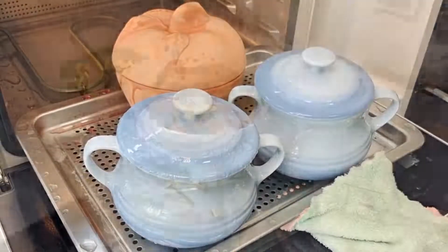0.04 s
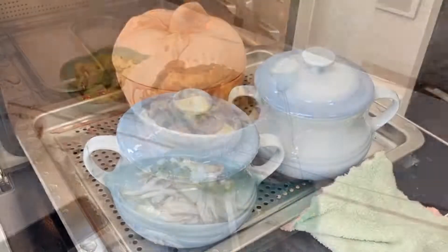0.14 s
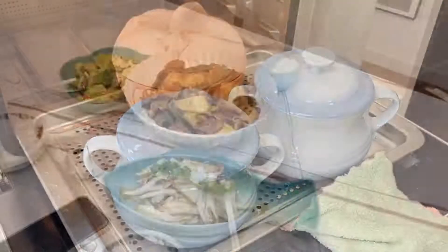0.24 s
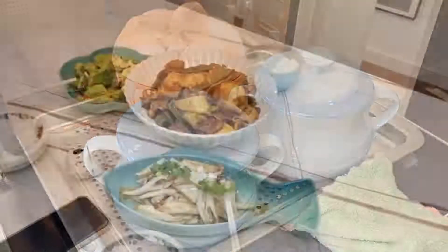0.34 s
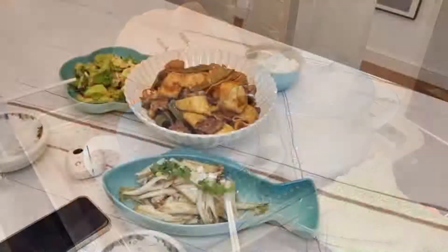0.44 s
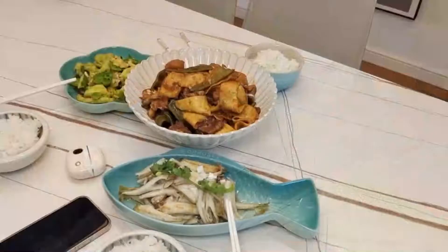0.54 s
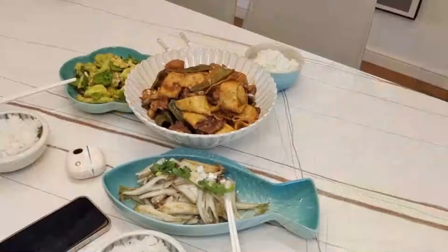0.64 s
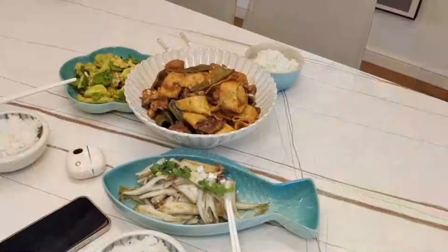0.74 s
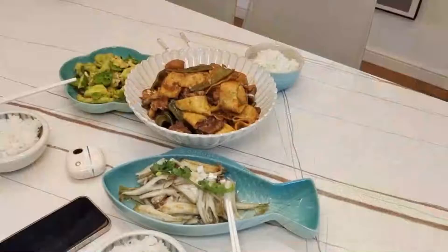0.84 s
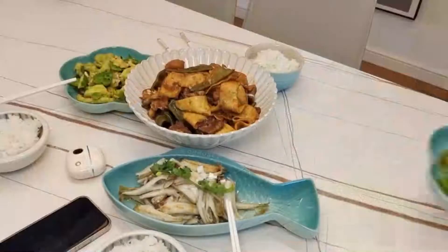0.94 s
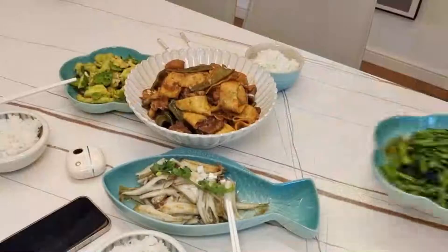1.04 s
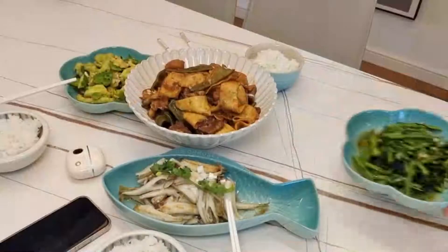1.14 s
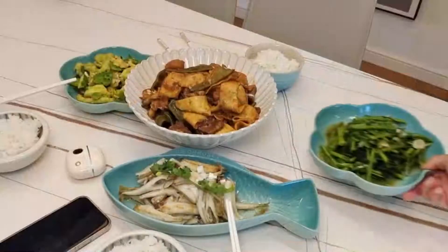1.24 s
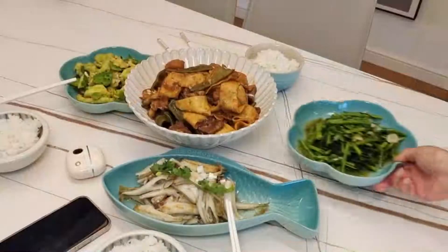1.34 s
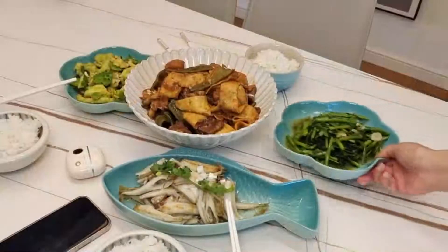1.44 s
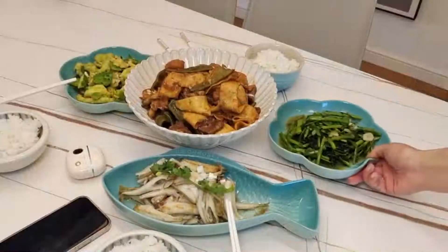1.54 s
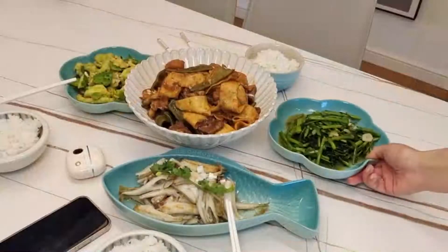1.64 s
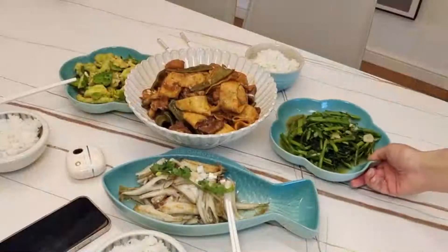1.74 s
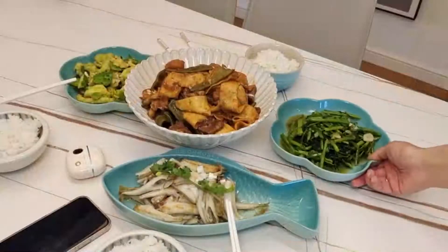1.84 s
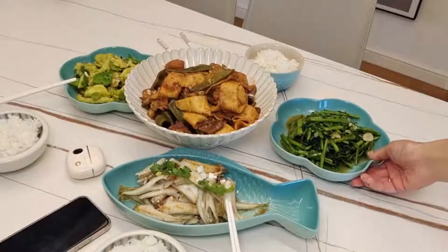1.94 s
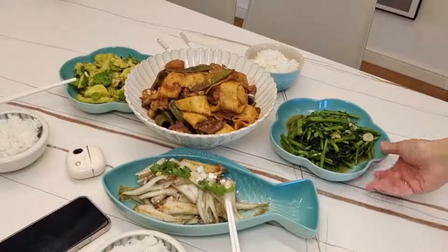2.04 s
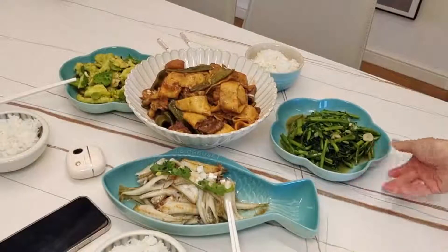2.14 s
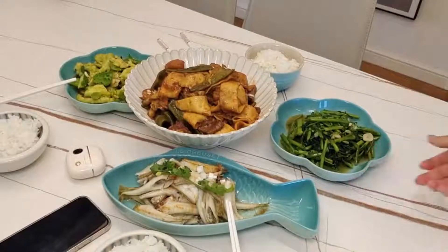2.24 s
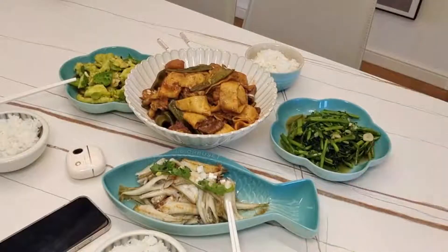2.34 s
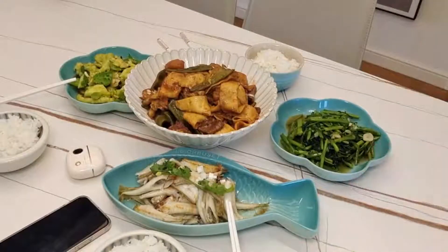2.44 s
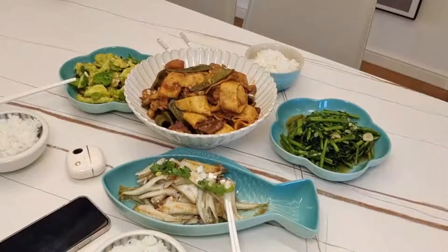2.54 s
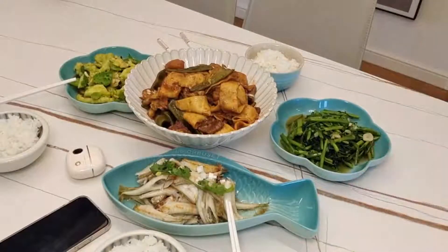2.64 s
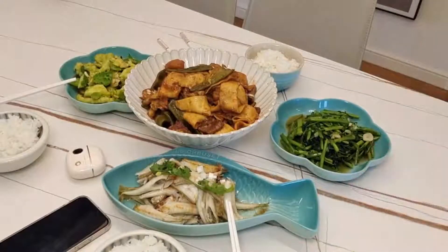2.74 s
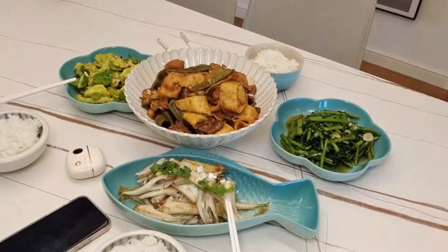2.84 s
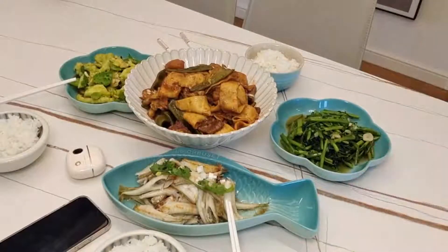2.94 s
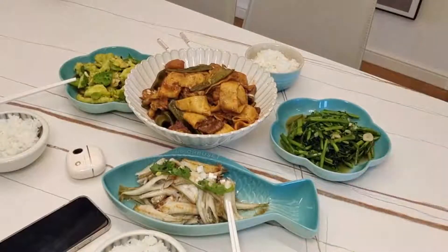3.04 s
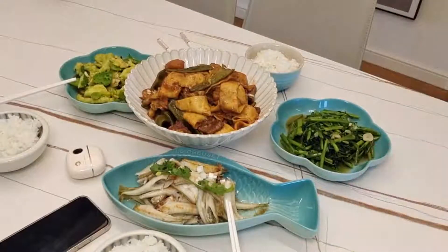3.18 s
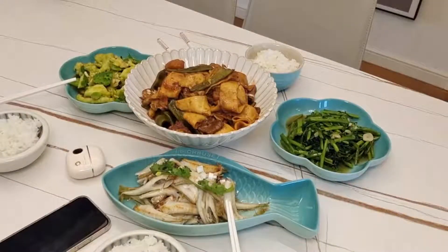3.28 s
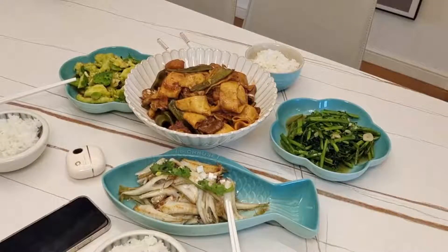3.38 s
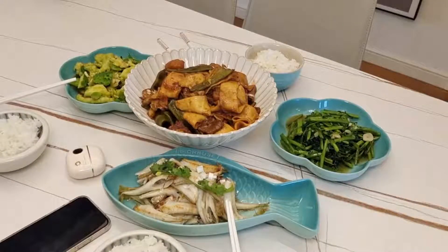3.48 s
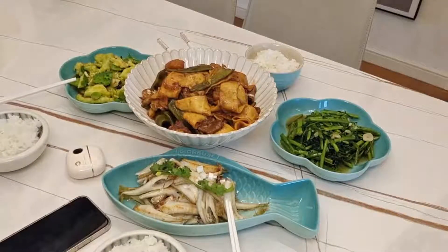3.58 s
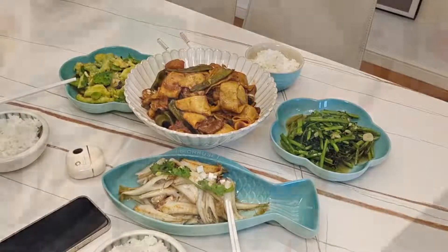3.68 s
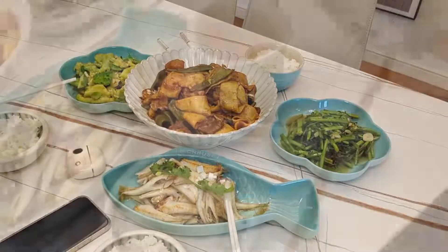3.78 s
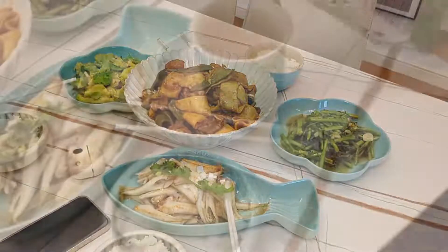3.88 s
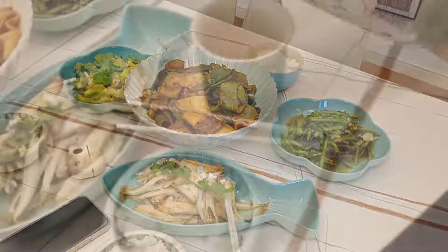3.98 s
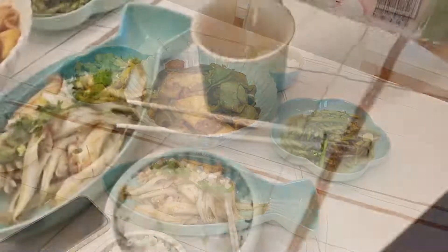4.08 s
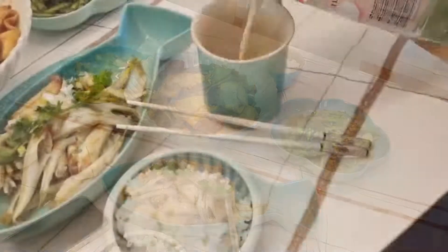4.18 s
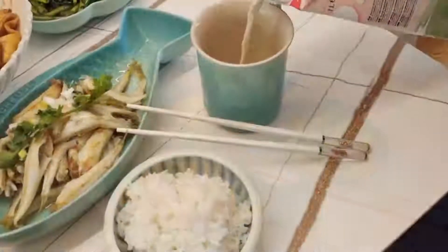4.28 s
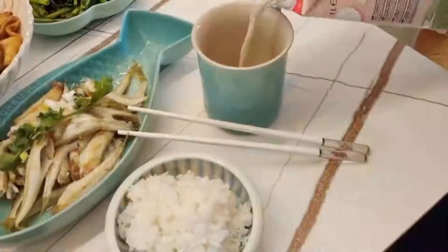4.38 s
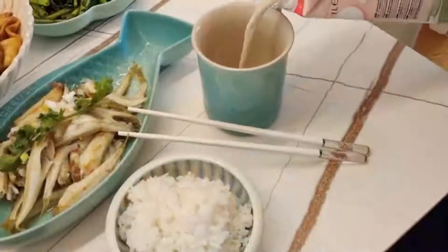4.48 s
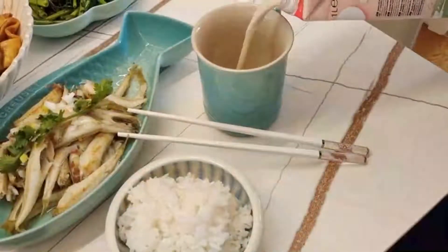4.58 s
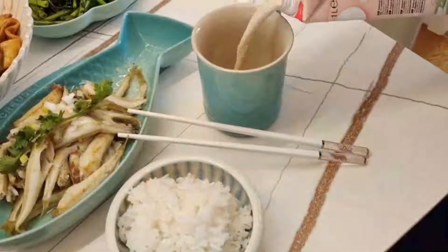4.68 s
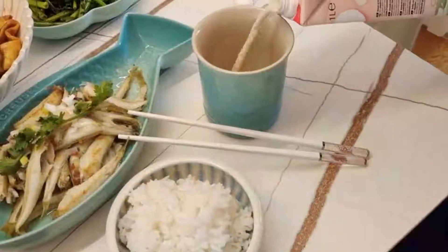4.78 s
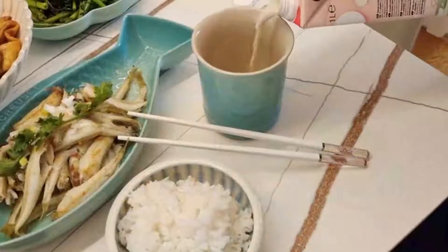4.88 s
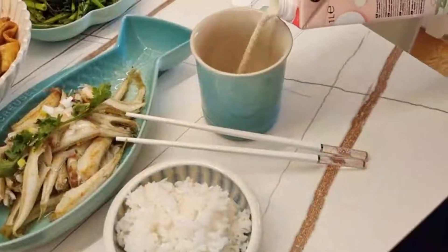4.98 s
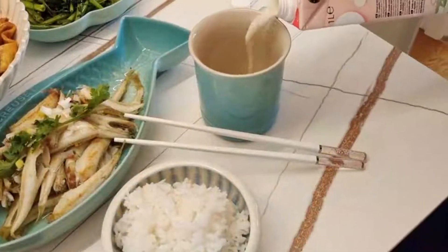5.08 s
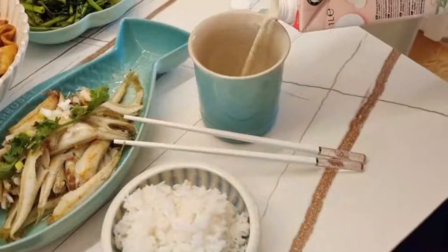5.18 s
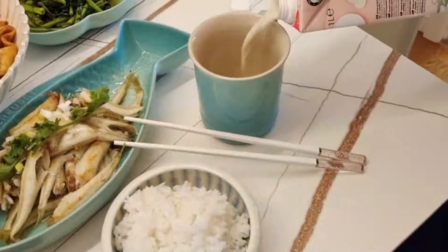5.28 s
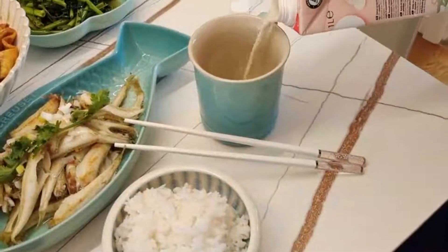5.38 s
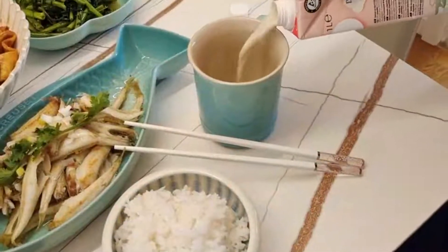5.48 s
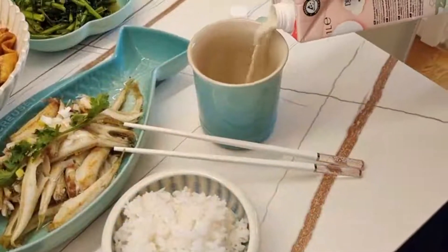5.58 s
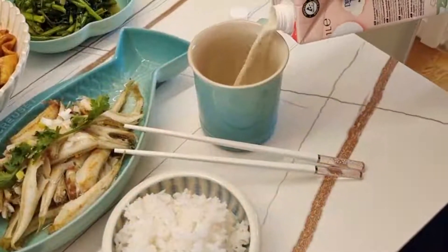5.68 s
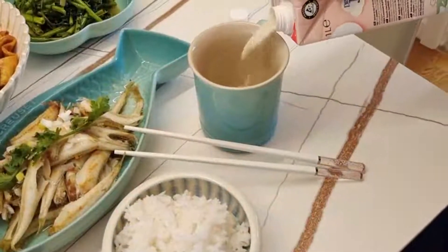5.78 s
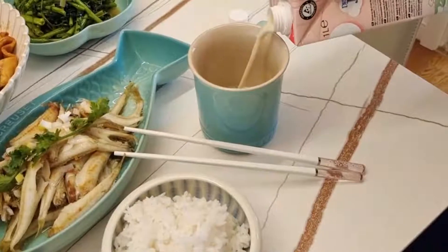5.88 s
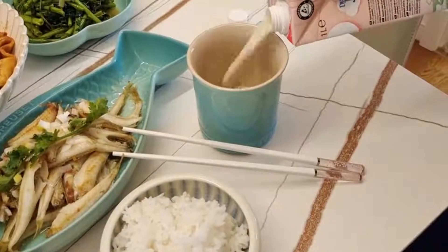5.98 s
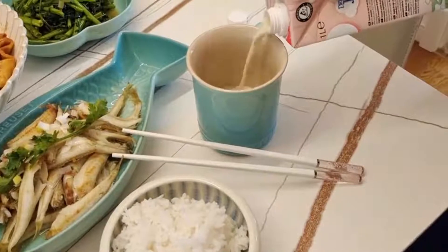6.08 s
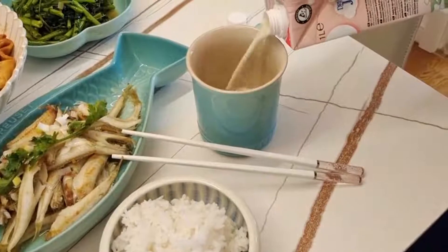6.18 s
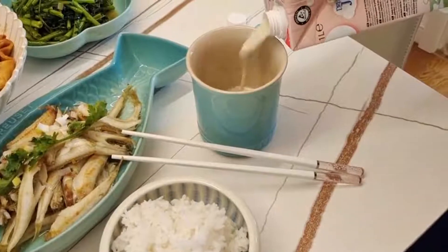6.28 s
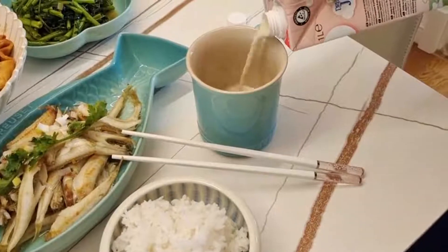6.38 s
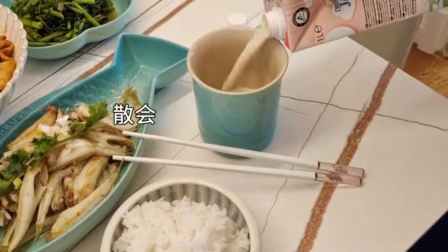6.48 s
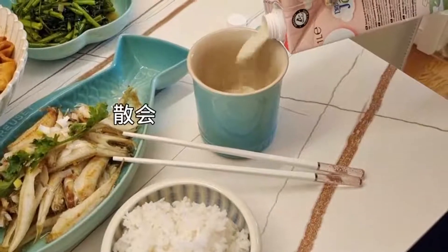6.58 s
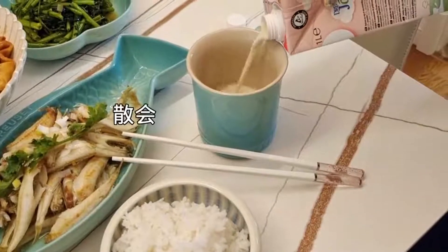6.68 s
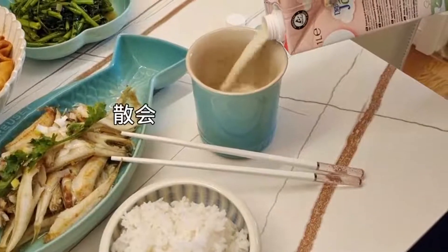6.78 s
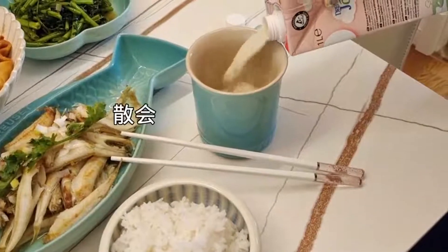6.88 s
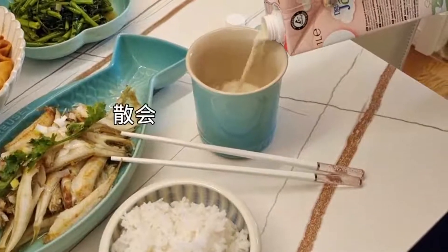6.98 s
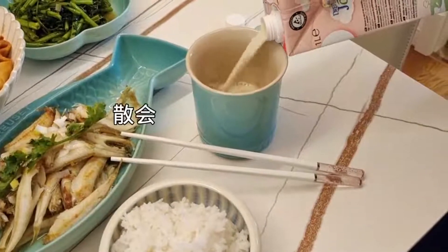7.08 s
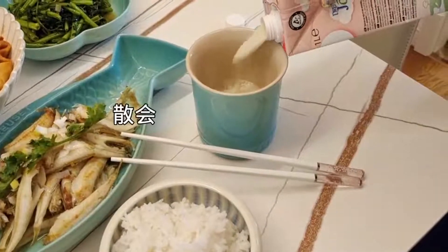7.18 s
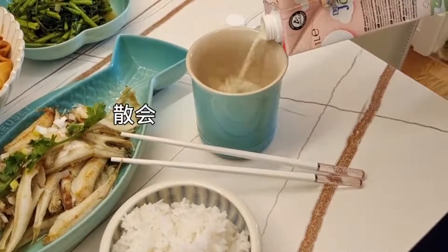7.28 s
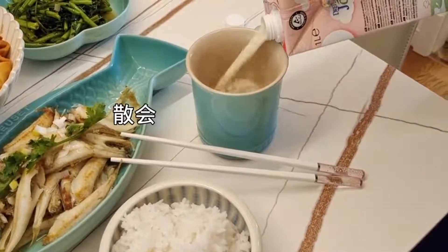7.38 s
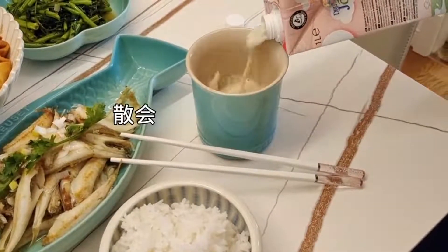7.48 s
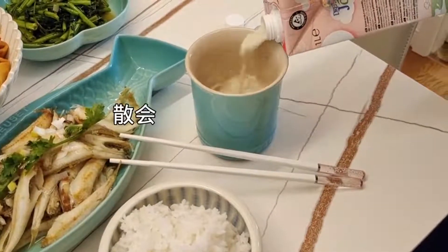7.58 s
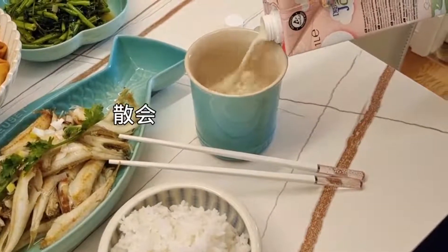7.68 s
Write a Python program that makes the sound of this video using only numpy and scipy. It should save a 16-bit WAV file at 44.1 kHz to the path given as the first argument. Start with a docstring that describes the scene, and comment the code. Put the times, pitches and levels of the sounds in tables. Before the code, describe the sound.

Very faint ticks open over soft indoor room tone. A heavy ceramic dish is set down hard, far louder than the rest, with a duller rattle just after and a short room tail. Then quiet; a few tiny clicks, and liquid pours into a cup in irregular spurts, plopping and splashing, with its hollow note slowly rising. Recorded close at the table, in stereo.

```python
"""A dish set down, then a drink poured

Faint scuffs, ticks and the brief ring of a ceramic lid sit over a low hum, a whine and soft room noise.
A ceramic dish knocks on a dining table and judders: each contact rings decaying modes and a noisy tail.
Then a carton pours a drink into a ceramic cup in uneven glugs. Single bubbles and swarms of tiny ones
excite the resonances of the air in the cup, whose lowest note climbs as it fills."""
import sys
import numpy as np
from scipy import signal
from scipy.fft import rfft, irfft, next_fast_len
from scipy.io import wavfile
from scipy.ndimage import uniform_filter1d

SR = 44100
rng = np.random.default_rng(int(sys.argv[2]) if len(sys.argv) > 2 else 0)


def int16_out(signal):
    """Quantize to a 16-bit WAV file."""
    q = np.round(np.clip(np.atleast_2d(signal).T, -1, 1) * 32767)
    wavfile.write(sys.argv[1], SR, q.astype(np.int16))


N = 340645  # length of the scene in samples

# Colour of the room noise, relative: (f/Hz, level/dB per Hz)
NOISE_COLOUR = [(20, -34), (45, -7), (75, -15), (110, -21), (160, -17), (205, -7.5), (390, -21.5),
                (600, -32.5), (730, -27), (1500, -41), (2400, -38.5), (4100, -49.5), (15500, -56.5)]
# How alike spread-out sound is at the left and right microphones: (f/Hz, likeness 0-1)
LEFT_RIGHT_LIKENESS = [(100, 0.86), (300, 0.76), (700, 0.18), (1500, 0.12), (4000, 0.1), (15000, 0.71)]
# How the room background changes: (t/s, hum level/dB, relative noise level/dB)
BACKGROUND_LEVELS = [(0, -60.5, 3), (3.49, -61.5, 0), (3.52, -62.5, 7), (4.05, -64.5, 6.5), (4.4, -63, 2),
                     (5.2, -69, 1), (7.7, -75.5, 4.5)]
NOISE_BASE_DB = -65
HUM_HZ = 56.3

# Modes of a faintly ringing ceramic lid: (f/Hz, level/dB, time to fall 60 dB/s)
LID_MODES = [(1933, -50.5, 0.11), (3560, -45, 0.13), (4670, -58, 0.14), (7273, -70.5, 0.16),
             (9100, -64, 0.12)]
# Faint scuffs and ticks of handling: (t/s, length/s, level/dB, centre f/Hz)
SCUFFS = [(0.129, 0.05, -67.5, 2170), (0.331, 0.035, -63, 2360), (0.656, 0.059, -56, 2440),
          (0.662, 0.055, -71.5, 7000), (3.529, 0.055, -61.5, 2715), (3.621, 0.0017, -54.5, 4340),
          (3.731, 0.0052, -55.5, 3130), (3.741, 0.0061, -56.5, 5700), (3.739, .011, -64, 1190)]

# Blows of the dish foot on the table; a harder blow has a higher treble limit, and a negative
# loss means growing bounces: (t/s, relative level/dB, treble limit f/Hz, loss per bounce/dB)
DISH_BLOWS = [(1.571, -19, 1100, 9), (1.5775, 5.5, 2450, 8.5), (1.622, -12, 2600, 9),
              (1.762, -12.5, 762, -2.3), (1.7859, -4, 800, 0.8), (1.8271, 0, 940, 10.5)]
# Modes of dish and table top: (f/Hz, relative level/dB, time to fall 60 dB/s)
DISH_MODES = [(135.1, -9.5, 0.69), (250.8, -8.5, 0.67), (314, -15, 0.36), (354.3, -7, 0.74),
              (371, -9.5, 0.35), (466.3, -7, 0.31), (549, -9.5, 0.22), (584, -15.5, 0.72), (620, -19, 0.27),
              (708, -11.5, 0.93), (756.5, 1.5, .33), (814, -12.5, 0.32), (991, -14.5, 0.46),
              (1235, -6.5, .42), (1505, -9, 0.44), (1759, 2.5, 0.31), (1920, -3.5, 0.45), (2043, -7.5, .65),
              (2240, -8, 0.63), (2480, -4.5, .25)]
# Colour of the dense ring of table and room: (f/Hz, relative level/dB per Hz)
RING_COLOUR = [(60, -32), (180, -34.5), (260, -6.5), (500, -6), (750, 2.5), (1000, -3.5), (2000, -2),
               (2800, -4), (3600, -12.5), (5500, -12), (6800, -20.5), (14000, -11)]
# How long that ring lasts: (f/Hz, time to fall 60 dB/s)
RING_DECAY = [(150, 0.72), (700, 0.48), (1800, 0.6), (3000, 0.49), (6000, 0.41), (14000, 0.35)]
BOUNCE_S, BOUNCE_RATIO = 0.0105, 0.78  # first gap between bounces, and how each next gap shrinks

# Single bubbles that plop out of the splashing: (t/s, f/Hz, peak level/dB, glide/octaves per s)
BUBBLES = [(4.311, 2256, -53, 15), (4.701, 2700, -61.5, -2), (4.754, 2540, -59, 27),
           (4.755, 5340, -51.5, -18), (4.851, 1223, -50, 19), (4.92, 5830, -43.5, -8),
           (4.968, 1790, -52.5, 28.5), (5.055, 2076, -50, 4), (5.201, 1900, -45.5, -4.5),
           (5.282, 794, -35, 7.5), (5.282, 1530, -36.5, 58.5), (5.289, 1272, -32.5, 50),
           (5.3779, 5610, -34, -12), (5.382, 860, -41, -17), (5.435, 801, -28, 3.5), (5.52, 2080, -43, -3),
           (5.5542, 1406, -38.5, 12), (5.596, 3900, -37, 14), (5.702, 2650, -44, 26.5),
           (5.7383, 789, -42, -2), (5.763, 839, -39, -7), (5.7964, 1930, -41, -13),
           (5.8768, 4600, -32.5, -2), (5.8914, 2390, -31, -12), (5.917, 797, -29, 2.5),
           (5.9364, 599, -39.5, 2), (6.0657, 1660, -43, 29), (6.0753, 853, -32, 13.5),
           (6.1413, 8200, -30.5, -16), (6.146, 1790, -38, 11), (6.208, 2414, -39, 8),
           (6.2656, 2670, -41.5, -8), (6.368, 3340, -45.5, -7), (6.5656, 2800, -44, 11),
           (6.698, 2820, -43, 2), (6.7339, 1830, -35.5, 19), (6.749, 450, -39.5, -12),
           (6.785, 1000, -39, 5.5), (6.8851, 922, -24.5, 3.5), (6.8993, 2020, -32.5, 8),
           (6.8966, 947, -24, -13), (6.9082, 405, -35, 10), (6.996, 2200, -32.5, 4),
           (7.0132, 2680, -38, 15), (7.0118, 363, -42, 12), (7.162, 1275, -40, -3),
           (7.2285, 2210, -37.5, -1), (7.314, 5780, -38, 47), (7.319, 1590, -36.5, -18),
           (7.4892, 708, -25, 8), (7.4905, 1287, -35.5, 22), (7.5004, 2123, -26.5, 10.5),
           (7.57, 1626, -39.5, 16), (7.6285, 836, -30.5, -22), (7.629, 372, -34.5, -12),
           (7.6313, 3680, -36, -6), (7.661, 359, -42, -13), (7.6777, 2370, -34, -2)]
# Gushes landing in the cup, with relative levels of three sizes of splash:
# (t/s, length/s, slosh level/dB, spray level/dB, fizz level/dB)
GUSHES = [(4.835, 0.027, -64.5, -65, -67), (4.909, 0.021, -68.5, -72, -61.5),
          (5.047, 0.023, -73, -58.5, -66.5), (5.199, 0.016, -63, -48.5, -65),
          (5.359, 0.031, -61.5, -52, -70), (5.572, 0.043, -59, -46.5, -77), (5.696, 0.076, -75, -54, -71.5),
          (5.791, 0.017, -73, -47.5, -67), (5.9, 0.07, -49, -58, -65), (6.065, 0.018, -45.5, -49.5, -66),
          (6.14, 0.005, -57, -44, -42.5), (6.206, .08, -59, -51, -65), (6.404, 0.035, -43.5, -52, -56),
          (6.551, 0.039, -46.5, -54, -78), (6.731, 0.044, -35.5, -46.5, -53),
          (6.886, 0.018, -36, -41.5, -60.5), (6.958, .03, -45, -51.5, -71), (7.009, .035, -45, -45, -52.5),
          (7.103, 0.015, -49, -54, -86), (7.156, .035, -43, -45.5, -53), (7.31, 0.012, -37.5, -41, -46),
          (7.481, 0.031, -34, -47.5, -57.5), (7.623, 0.022, -36.5, -41.5, -52),
          (7.677, 0.036, -44, -47.5, -65.5)]
# Colour of the tiny droplets and bubbles in a gush: (f/Hz, relative level/dB)
DROPLET_COLOUR = [(190, -4.5), (380, -3.5), (550, -6), (850, 3.5), (1400, -4), (2700, -6), (3200, -12.5),
                  (4600, -10), (6000, -14), (8500, -12.5), (11000, -26), (14500, -16.5)]
# How far the carton is tipped; the stream thickens and its gushes grow tongues: (t/s, tilt 0-1)
CARTON_TILT = [(5.4, 0.14), (5.75, 0.85)]
# The main note of the air column, which shortens as the cup fills: (t/s, f/Hz)
CUP_AIR_NOTE = [(5.2, 770), (5.8, 828), (6.3, 830), (6.9, 975), (7.701, 1000)]
# Cross modes of the air in the cup: (f/Hz, width/Hz, level/dB)
CUP_CROSS_MODES = [(1472, 19, -3.5), (1940, 69, 4.5), (2124, 38, -6), (2513, 38, 2.5), (2658, 36, 11),
                   (2770, 76, 2.5), (3400, 160, 5), (4650, 36, -1), (6300, 54, 0.5), (8940, 84, 1)]
# Phase of the cup between the two microphones: (f/Hz, left lead/radians)
CUP_PHASE = [(300, 0.5), (780, .5), (950, 1.5), (1620, 1), (1950, -1.7), (2400, -2), (2750, -5), (4700, -5),
             (8000, -5.5)]
# Balance of the cup between the two microphones: (f/Hz, left minus right level/dB)
CUP_BALANCE = [(400, 1), (900, 2.5), (1750, 7.5), (2500, -9.5), (3300, 0.5), (5000, -4), (8000, -2),
               (15000, 2)]
SWELL_CYCLES = 4.3  # a single bubble swells for at least this many cycles, so high ones are brief
CLIMB_GLIDE = 32  # octaves per s: a bubble that climbs this fast swells for twice as long
LEAD_S, LEAD_WIDTH_S = 0.036, 0.012  # a thin tongue of droplets lands this long before a gush
THICKEN_S, TONGUE_SCATTER = 0.07, 0.46  # time for bubbles to grow before a gush; their size scatter 0-1
SLAP_S = 0.012  # fade time of the wet slap of a bubble

EDGE_HZ = 15800  # upper limit of the whole sound


def amp(db):
    """Turns decibels into gain."""
    return 10 ** (np.asarray(db) / 20)


def unit(x):
    """Scales a sound to an average (rms) strength of 1."""
    return x / np.sqrt(np.mean(x ** 2) + 1e-20)


def read(points, hz):
    """Reads a table between its points along a logarithmic frequency axis."""
    f, value = np.transpose(points)
    return np.interp(np.log(hz + 1), np.log(f), value)


def follow(points, t):
    """Reads a two-column table between its points in time."""
    return np.interp(t, *np.transpose(points))


def add(mix, s, sound):
    """Mixes a sound in at time s, cutting off what runs past the end."""
    part = mix[..., max(round(s * SR), 0):][..., :sound.shape[-1]]
    part += sound[..., :part.shape[-1]]


def shape(x, response):
    """Filters a sound by a function of frequency."""
    size = next_fast_len(x.shape[-1] + 4096)
    spectrum = rfft(x, size) * response(np.fft.rfftfreq(size, 1 / SR))
    return irfft(spectrum, size)[..., :x.shape[-1]]


def diffuse(size):
    """Stereo noise from all around: most alike at both microphones in the bass and highest treble."""
    a, b = rng.standard_normal((2, size))
    same = lambda hz: np.clip(read(LEFT_RIGHT_LIKENESS, hz), -1, 1)
    mid = shape(a, lambda hz: np.sqrt((1 + same(hz)) / 2))
    side = shape(b, lambda hz: np.sqrt((1 - same(hz)) / 2))
    return np.array([mid + side, mid - side])


def tail(colour, t60, size=SR):
    """A dense stereo decay with energy 1 per channel on average; each band dies at its own speed."""
    hz, t, z = signal.stft(diffuse(size), SR, nperseg=512)
    fade_db = -60 * t / read(t60, hz)[:, None]
    z = z * amp(read(colour, hz)[:, None] + fade_db)
    return unit(signal.istft(z, SR)[1][:, :size]) / np.sqrt(size)


def background(room_noise_db=1, whine_hz=5523, whine_db=-98):
    """A gently wavering appliance hum and a faint steady whine over soft room noise."""
    s, hum_db, noise_db = np.transpose(BACKGROUND_LEVELS)
    t = np.arange(N) / SR
    waver = 1 + 0.1 * unit(shape(rng.standard_normal(N), lambda hz: np.exp(-hz / 5)))
    hum = amp(np.interp(t, s, hum_db)) * np.sqrt(2) * waver * np.sin(2 * np.pi * HUM_HZ * t)
    noise = shape(diffuse(N), lambda hz: amp(read(NOISE_COLOUR, hz)))
    noise /= np.std(shape(noise, lambda hz: hz > 80))  # set the level by what lies above 80 Hz
    noise_gain = amp(NOISE_BASE_DB + room_noise_db + np.interp(t, s, noise_db))
    whine = amp(whine_db) * np.sin(2 * np.pi * whine_hz * t)
    return hum + whine + noise_gain * noise


def handling(sharpness=4.3, skirt=0.0025, lag_turns=0.28, room_db=-4):
    """Decaying lid tones and brief bands of scuffing noise, with a room tail added."""
    t, out = np.arange(SR) / SR, np.zeros((2, N))
    for s, length, db, centre_hz in SCUFFS:
        def band(hz):
            """A peak on a skirt that is stronger for shorter contacts, giving them a wider spectrum."""
            peak = 1 / (1 + (sharpness * np.log2((hz + 1) / centre_hz)) ** 2)
            return (hz > 600) * skirt / np.sqrt(length) + peak
        u = t / length * 2
        add(out, s, amp(db) * unit(shape(diffuse(SR), band)) * (u * np.exp(1 - u)) ** 2)
    lag = np.array([[0], [lag_turns]])  # right channel is ahead by part of a cycle
    for hz, db, t60 in LID_MODES:
        fade = amp(db - 60 * t / t60) * np.minimum(t / 0.00047, 1)
        add(out, 0, fade * np.sin(2 * np.pi * (hz * t + lag)))
    room = tail([(300, -2.0), (12000, -3.5)], RING_DECAY)
    return out + amp(room_db) * signal.fftconvolve(out, room, axes=1)[:, :N]


def bounces(count=5):
    """Every blow chatters in ever quicker contacts, mostly weakening: (t/s, level/dB, treble limit/Hz)."""
    for s, db, corner_hz, loss_db in DISH_BLOWS:
        for k in range(count):
            yield s, db - k * loss_db, corner_hz
            s += BOUNCE_S * BOUNCE_RATIO ** k


def dish(knock_db=-8, knock_hz=720, knock_s=0.0011, modes_db=-27, after_db=-37, after_t60=1.76,
         ring_db=15.0, build_s=0.0028):
    """Each contact gives a short knock, rings the modes and stirs the room; soft blows lack treble."""
    t, out = np.arange(SR) / SR, np.zeros((2, N))
    knock_shape = t / knock_s * np.exp(1 - t / knock_s)
    knock = amp(knock_db) * knock_shape * np.sin(-2 * np.pi * knock_hz * t)
    body = np.zeros((2, SR))
    for hz, db, t60 in DISH_MODES:
        # a quick decay gives way to a faint long one
        fade = amp(-60 * t / t60) + amp(after_db - 60 * t / after_t60 * max(hz / 1100, 1))
        # high modes reach the two microphones further out of step
        lag = np.array([[1], [-1]]) * min(hz / 1500, 1) * rng.uniform(0.59, 0.95)
        body += amp(modes_db + db) * fade * np.sin(2 * np.pi * hz * t + lag)
    for s, db, corner_hz in bounces():
        ring = amp(ring_db) * tail(RING_COLOUR, RING_DECAY) * (1 - np.exp(-t / build_s))
        soften = signal.butter(2, min(corner_hz, SR / 3), fs=SR, output="sos")
        add(out, s, amp(db) * signal.sosfilt(soften, knock + body + ring))
    # a steep high-pass at 150 Hz keeps deep bass out of the dish sound
    return signal.sosfilt(signal.butter(4, 150, "high", fs=SR, output="sos"), out)


def bubble(hz, swell_s, glide):
    """A bubble swells, rings and dies as its pitch glides; one that climbs far enough bursts at the surface."""
    t = np.arange(0, 7 * swell_s, 1 / SR)
    u, octaves = t / swell_s, glide * (t - swell_s)
    alive = np.exp(-(np.maximum(octaves, 0) / 0.8) ** 4)
    swell = (u * np.exp(1 - u)) ** 1.5
    return alive * swell * np.sin(2 * np.pi * np.cumsum(hz * 2 ** octaves) / SR)


def swarm(low_hz, high_hz, levels_db, per_s, swell_s, spread_db, linger_s, trickle_db, lead_db,
          trickle_s=0.19, favour_db=4, count=48):
    """Each gush sheds small bubbles of many sizes at random moments, with a fading trickle behind it."""
    pitches, out = np.geomspace(low_hz, high_hz, count), np.zeros(N)
    grains = []
    for hz in pitches:
        grain_swell_s = swell_s * rng.uniform(0.5, 1.5) * np.sqrt(low_hz / hz)
        g = bubble(hz, grain_swell_s, rng.uniform(-8, 18))
        grains.append(unit(g) / np.sqrt(len(g)) * np.sqrt(hz) * amp(read(DROPLET_COLOUR, hz)))
    t = np.arange(-SR // 14, SR // 4) / SR  # time around the landing of the gush
    tongue = amp(lead_db) * np.exp(-((t + LEAD_S) / LEAD_WIDTH_S) ** 2)
    trickle = amp(trickle_db) * np.exp(np.minimum(t, 0) / 0.016 - np.maximum(t, 0) / trickle_s)
    for (s, length, *_), db in zip(GUSHES, levels_db):
        chance, size, kind = rng.random((3, len(t)))
        # before the landing the smallest bubbles come first, then ever bigger ones, so pitch falls
        early_kind = np.clip(-t / THICKEN_S + TONGUE_SCATTER * (kind - 0.5), 0, 1)
        kind = np.where(t < 0, early_kind, kind)
        bulk = np.exp(np.minimum(t, 0) / 0.0035 - np.maximum(t - length, 0) / linger_s)
        flow = follow(CARTON_TILT, s) * tongue + bulk + trickle
        # each gush favours its own bubble sizes
        favoured = amp(favour_db * unit(uniform_filter1d(rng.standard_normal(count), size=5)))
        # a few bubbles are far louder than the rest
        strength = flow * amp(spread_db * np.minimum(-np.log(size), 4.5))
        gush = np.zeros(len(t))
        for i in np.flatnonzero(chance < per_s / SR):
            k = round(kind[i] * (count - 1))
            add(gush, i / SR, strength[i] * favoured[k] * grains[k])
        add(out, s + t[0], amp(db) * unit(gush) * np.sqrt(length * SR / len(t)))
    return out


def resonate(x, hz, width):
    """A resonance of peak gain about 1 that can follow a moving frequency."""
    turn = np.exp(2j * np.pi * np.cumsum(hz * np.ones(N)) / SR)
    r = np.exp(-np.pi * width / SR)
    # shift the resonance to 0 Hz, smooth there, then shift back
    return 2 * (turn * signal.lfilter([1 - r], [1, -r], x / turn + 1e-18)).real


def ports(hz):
    """Gain and phase from the cup to the left and right microphones."""
    side = np.array([[0.5], [-0.5]])
    gain = amp(side * read(CUP_BALANCE, hz))
    return gain / np.sqrt((gain ** 2).mean(0)) * np.exp(1j * side * read(CUP_PHASE, hz))


def table_echoes(x, echo_db=-12, count=4):
    """Dishes and table top throw back a few quick reflections."""
    out = np.zeros_like(x)
    for delay_s in rng.uniform(0.00103, 0.0077, count):
        add(out, delay_s, amp(echo_db) * x)
    return shape(out, lambda hz: hz / (hz + 2000))  # small surfaces reflect mostly treble


def pour(bubbles_db=0.0, slosh_db=-2, spray_db=-3, fizz_db=-1, air_db=-8, air_width=26, slap_db=-7,
         room_db=-10):
    """Bubbles and splashes sound inside the cup, whose air rings on; the room answers softly."""
    liquid, slaps = np.zeros((2, N))
    slap_fade = np.exp(-np.arange(SR // 10) / SR / SLAP_S)
    for s, hz, db, glide in BUBBLES:
        swell_s = SWELL_CYCLES / hz * (1 + max(glide, 0) / CLIMB_GLIDE)
        add(liquid, s, amp(db + bubbles_db) * bubble(hz, swell_s, glide))
        # the surface closing over a bubble makes a small wet slap, stronger as the stream thickens
        slap = rng.standard_normal(len(slap_fade)) * slap_fade
        add(slaps, s, follow(CARTON_TILT, s) * amp(db + slap_db) * slap)
    slap_colour = [(400, -9.0), (2500, 9.5), (9000, -66)]
    liquid += shape(slaps, lambda hz: amp(read(DROPLET_COLOUR, hz) + read(slap_colour, hz)))

    _, _, slosh, spray, fizz = np.transpose(GUSHES)
    liquid += swarm(200, 1450, slosh + slosh_db, per_s=700, swell_s=0.0084, spread_db=3,
                    linger_s=0.016, trickle_db=-22, lead_db=-41.5)
    liquid += swarm(1500, 5900, spray + spray_db, per_s=1100, swell_s=0.0042, spread_db=3,
                    linger_s=0.006, trickle_db=-13.5, lead_db=-3)
    # the finest spray is a dense hiss of very short ticks
    liquid += swarm(5280, 15500, fizz + fizz_db, per_s=3000, swell_s=0.0004, spread_db=5,
                    linger_s=0.0081, trickle_db=-24.5, lead_db=-11)

    air_hz = follow(CUP_AIR_NOTE, np.arange(N) / SR)
    cup = liquid + amp(air_db) * resonate(liquid, air_hz, air_width)
    for hz, width, db in CUP_CROSS_MODES:
        cup += amp(db) * resonate(liquid, hz, width)
    room = tail([(200, -5.0), (800, -5.5), (2500, -9), (6000, -9.5), (14000, -7.0)],
                [(300, 0.27), (2500, 0.26), (12000, 0.21)])
    near = shape(cup, ports) + np.array([table_echoes(cup), table_echoes(cup)])
    return near + amp(room_db) * signal.fftconvolve(cup[None], room, axes=1)[:, :N]


def scene():
    """Everything at the table and in the room."""
    return background() + handling() + dish() + pour()


def record(dry):
    """A low-pass filter, the recorder's upper band limit."""
    low_pass = signal.firwin(511, EDGE_HZ, window=("kaiser", 9), fs=SR)
    return signal.oaconvolve(dry, low_pass[None], "same")


dry = scene()
out = record(dry)
int16_out(out)
```